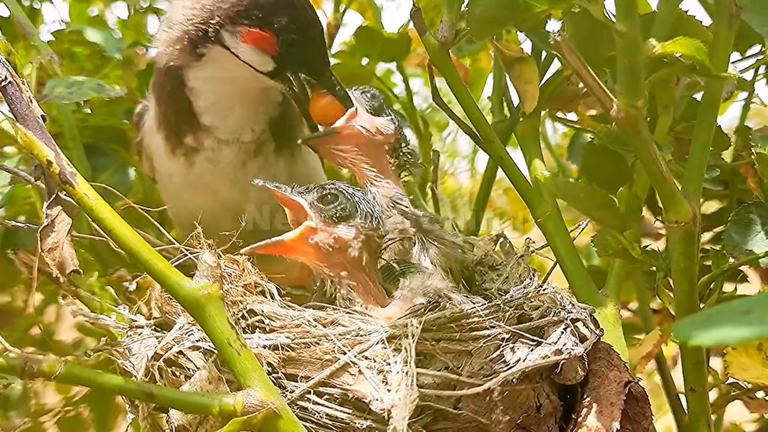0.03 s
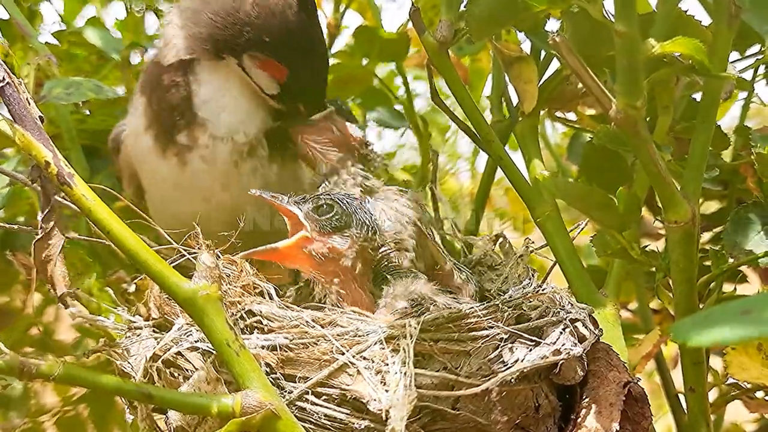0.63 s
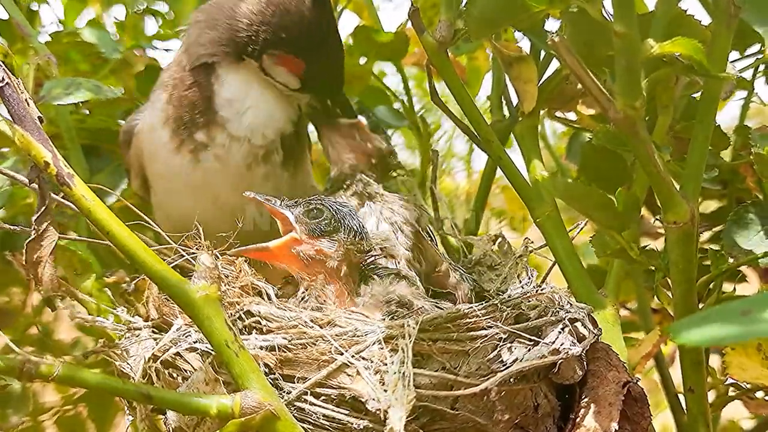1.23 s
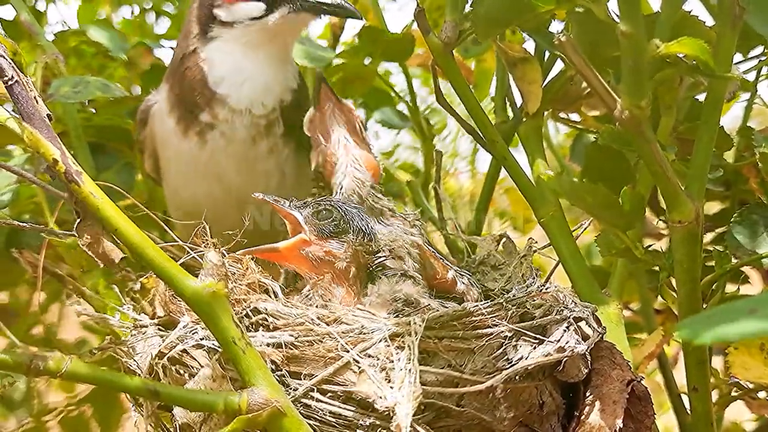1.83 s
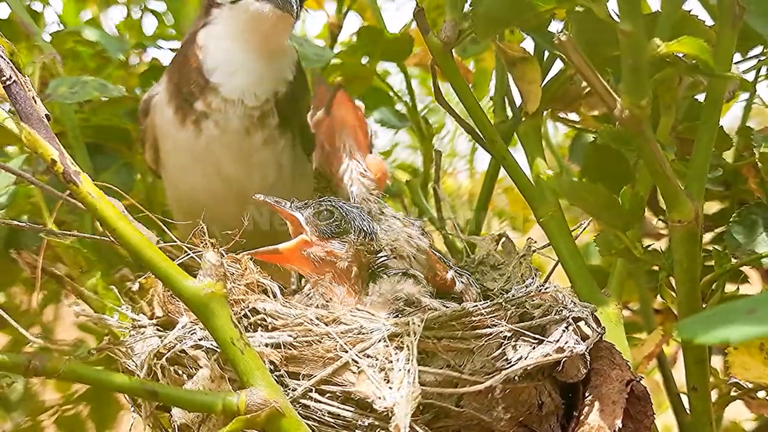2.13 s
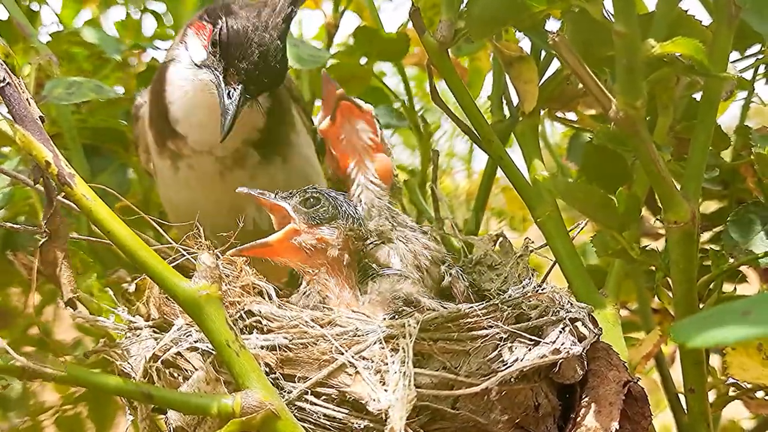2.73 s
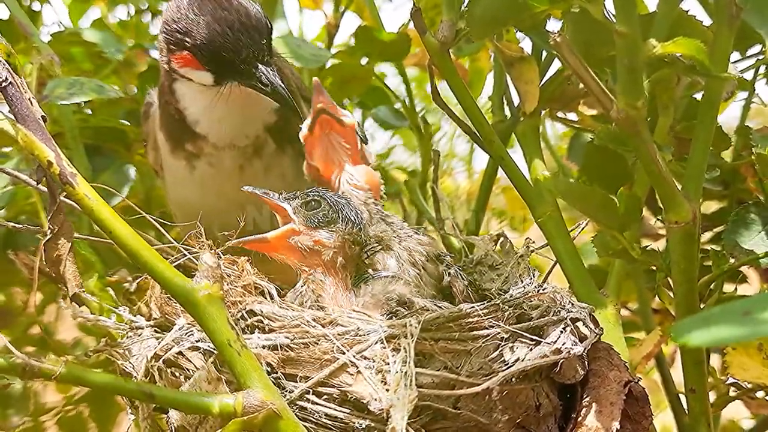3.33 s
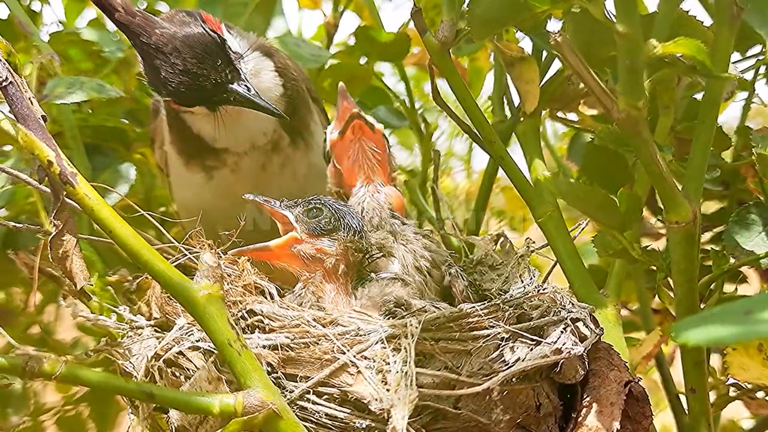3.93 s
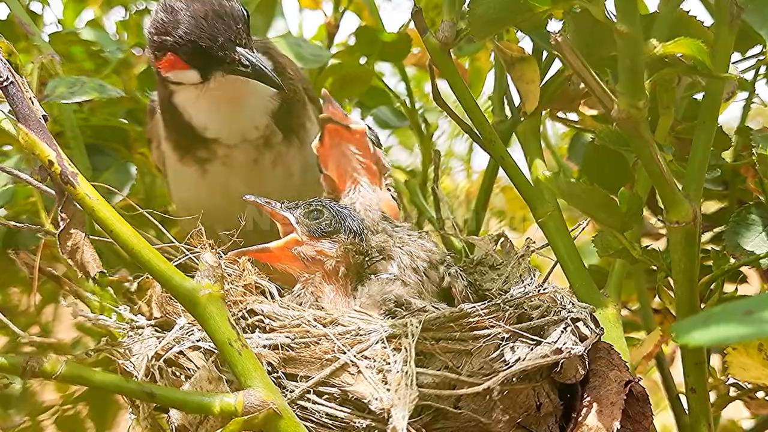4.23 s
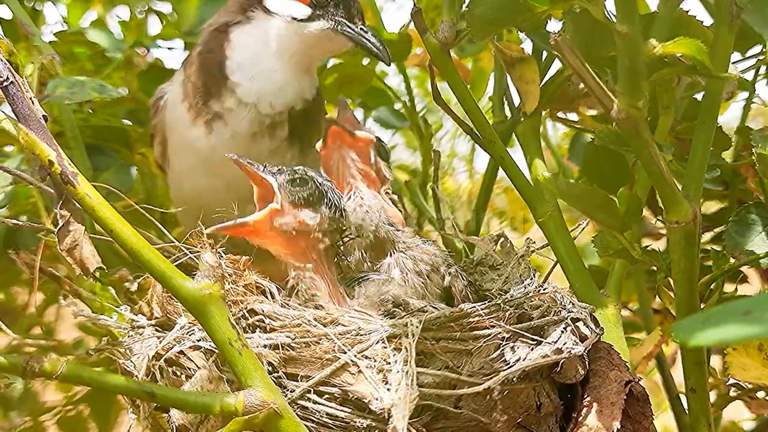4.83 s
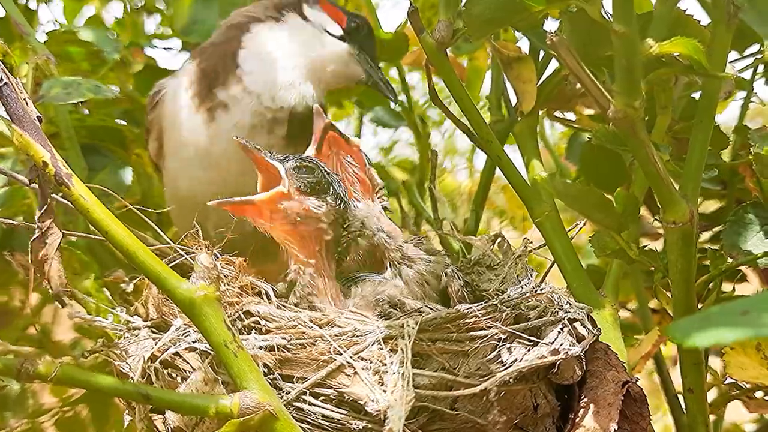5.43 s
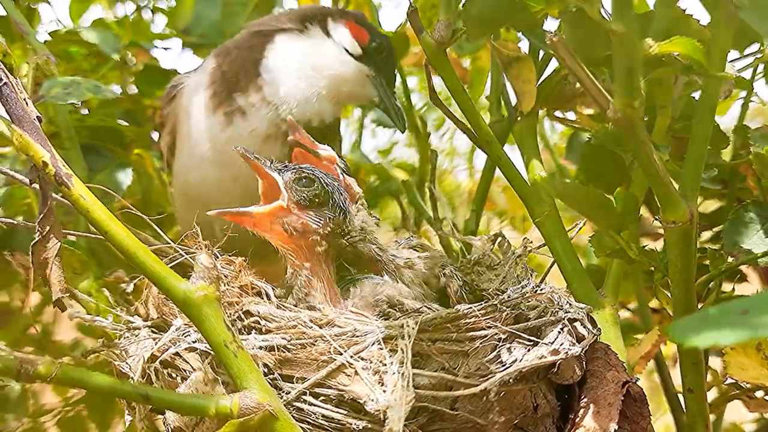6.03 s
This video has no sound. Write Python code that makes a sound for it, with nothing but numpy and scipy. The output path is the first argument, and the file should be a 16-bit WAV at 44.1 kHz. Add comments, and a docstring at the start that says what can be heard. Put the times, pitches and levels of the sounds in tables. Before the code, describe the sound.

Nestlings beg with raspy chirps and hissy squeaks while gusts buffet the microphone over a faint distant engine.

```python
"""Nestlings in a windy bush

Close to a nest in the leaves, one chick repeats a raspy arched chirp, a second bird answers with hissy
down-and-up swoops, and dry nest fibres tick. Songbirds whistle further off and a slow engine thuds in
the distance, under an outdoor hush. Gusts stir the leaves and buffet the two microphone ports,
mostly the right one."""
import sys
import numpy as np
from scipy import signal
from scipy.fft import rfft, irfft, next_fast_len
from scipy.io import wavfile
from scipy.ndimage import uniform_filter1d, map_coordinates

SR = 44100
rng = np.random.default_rng(int(sys.argv[2]) if len(sys.argv) > 2 else 0)


def bounce(signal):
    """Save signal as a 16-bit WAV file at the path given by the first command-line argument."""
    frames = np.transpose(np.atleast_2d(signal))
    limited = np.clip(frames, -1, 1)
    pcm = np.round(limited * 32767).astype(np.int16)
    wavfile.write(sys.argv[1], SR, pcm)


N = 267951

# Colour of dry nest fibres and leaves. Each row: frequency in Hz, relative level in dB.
FIBRE_SPECTRUM = [(2000, -18), (6000, -4.5), (9500, 4), (13000, -3.5), (16000, -9)]


def amp(db):
    return 10 ** (np.asarray(db) / 20)


def unit(x):
    return x / np.sqrt(np.mean(np.abs(x) ** 2) + 1e-20)


def step(x):
    """A smooth rise from 0 to 1 around x = 0."""
    return .5 + .5 * np.tanh(x / 2)


def along(points, hz):
    """Read (Hz, value) points on a log frequency axis."""
    f, values = np.transpose(points)
    return np.interp(np.log(hz + 1), np.log(f + 1), values)


def wobble(rate, size):
    """A smooth random curve, rate knots a second."""
    knots = rng.standard_normal(int(size * rate / SR) + 4)
    return map_coordinates(knots, [np.arange(size) * rate / SR])


def filtered(x, response):
    """Pass x through a complex response of frequency."""
    n = x.shape[-1]
    padded = next_fast_len(n + 4096)
    return irfft(rfft(x, padded) * response(np.fft.rfftfreq(padded, 1 / SR)), padded)[..., :n]


def noise(spectrum):
    """Noise of rms 1 with the given colour."""
    return unit(filtered(rng.standard_normal(N), lambda hz: amp(along(spectrum, hz))))


def add(track, start, x):
    """Mix x into the track from start, in seconds."""
    part = track[..., max(round(start * SR), 0):][..., :x.shape[-1]]
    part += x[..., :part.shape[-1]]


def tone(hz, rough, width_hz):
    """A gliding partial of rms 1; its rough share is smeared into a band around the pitch."""
    rough = np.clip(rough, 0, 1)
    smear = unit(wobble(width_hz, len(hz)) + 1j * wobble(width_hz, len(hz)))
    carrier = np.exp(2j * np.pi * np.cumsum(hz) / SR)
    return np.sqrt(2) * np.real((np.sqrt(1 - rough) + np.sqrt(rough) * smear) * carrier)


def gust_strength(breeze_db=-47, rise_s=0.024, fall_s=0.037, stir_db=-7, lead_s=0.15, trail_s=.22):
    """Buffeting and extra eddies per port, in dB: each gust rises, holds and falls in a slower stir."""
    # Each row: arrival and hold in seconds, left and right port levels in dB, extra small eddies in dB.
    gusts = [(0.0, 0.1, -24.5, -23.5, -0.5), (0.318, 0.34, -30, -26.5, 4), (1.719, .12, -30.5, -16, -14),
             (1.884, 0.4, -21.5, -17, 0), (2.357, 0.15, -26, -31.5, 0), (3.962, 0.16, -39, -20, 3.5),
             (4.126, .17, -27.5, -14, -7.5), (4.398, 0.29, -29.5, -15, 4.5), (4.727, 0.21, -17.5, -20, 1.5),
             (5.077, 0.038, -30, -12, -7.5), (5.2, 0.13, -29, -14.5, 6.5), (5.428, 0.098, -17, -17.5, 3.5),
             (6.003, 0.13, -34.5, -23.5, -3.5)]
    t = np.arange(N) / SR
    power, eddies = np.full((2, N), amp(breeze_db) ** 2), np.zeros((2, N))
    for arrival, hold, left_db, right_db, eddy_db in gusts:
        early, late = np.maximum(arrival - t, 0), np.maximum(t - arrival - hold, 0)
        core = np.exp(-early / rise_s - late / fall_s)
        stir = amp(stir_db) * np.exp(-early / lead_s - late / trail_s)
        gust = np.outer(amp([left_db, right_db]), np.maximum(core, stir)) ** 2
        power += gust
        eddies += eddy_db * gust
    return 10 * np.log10(power), eddies / power


def wind(db, flutter_db, lumps_db=2):
    """Turbulence on one microphone port: the harder it blows, the more small fast eddies it holds."""
    # Colours of the large and the small eddies. Each row: frequency in Hz, relative level in dB.
    rumble_spectrum = [(15, -34), (34, -11), (55, -0.5), (88, 3.5), (120, -0.5), (190, -11.5), (280, -18),
                       (500, -43), (1000, -64), (2500, -110)]
    flutter_spectrum = [(60, -56), (150, 5), (260, 2), (400, -9.5), (600, -21.5), (850, -30), (1200, -61),
                        (3000, -88)]
    rumble = unit(noise(rumble_spectrum) * amp(lumps_db * wobble(28, N)))
    flutter = unit(noise(flutter_spectrum) * amp(7.05 * wobble(45, N) + 1.2 * wobble(14, N)))
    return amp(db) * (rumble + flutter * amp(flutter_db + db + 15))


def rustle(strength_db, average_db=-62.5, db_per_wind_db=0.24, smooth_s=.5, right_db=-3, flicker_db=1.8):
    """Leaves hiss softly while the gusts pass."""
    stirred_db = uniform_filter1d(strength_db.max(axis=0), int(smooth_s * SR))
    level_db = average_db + db_per_wind_db * (stirred_db - stirred_db.mean()) + flicker_db * wobble(60, N)
    return np.array([noise(FIBRE_SPECTRUM), amp(right_db) * noise(FIBRE_SPECTRUM)]) * amp(level_db)


def engine(level_db=-37, firing_hz=22.38, pipe_hz=96, width_hz=34, port_phase_rad=1.82):
    """Far off, each firing rings a low exhaust resonance, which arrives out of step at the two ports."""
    cycles = np.cumsum(firing_hz * (1 + 0.00695 * wobble(6.3, N))) / SR
    firings = np.diff(np.floor(cycles), prepend=0) * amp(2.7 * wobble(25, N))
    pipe = lambda f: (1j * f * width_hz * 1.5 / (pipe_hz ** 2 - f * f + 1j * f * width_hz * 1.09)) ** 2
    ports = np.exp(1j * port_phase_rad * np.array([[0], [1]]))
    return unit(filtered(firings, lambda f: pipe(f) * ports)) * amp(level_db)


def air(level_db=-49, patchy_db=2):
    """Outdoor hush in drifting patches, unrelated at the two ports."""
    # Colour of the hush. Each row: frequency in Hz, relative level in dB.
    hush_spectrum = [(15, -1), (50, -7.5), (170, -1.5), (400, 1.5), (750, -9), (1050, -15.5), (1650, -7),
                     (2300, -8), (3200, -14.5), (5500, -19), (9500, -27), (15800, -40)]
    hush = signal.stft(np.array([noise(hush_spectrum), noise(hush_spectrum)]), nperseg=1024)[2]
    patches = uniform_filter1d(rng.standard_normal(hush.shape[1:]), size=6, axis=0)
    patches = uniform_filter1d(patches, size=7, axis=1)
    return amp(level_db) * signal.istft(hush * amp(patchy_db * unit(patches)), nperseg=1024)[1][:, :N]


def hisses():
    """Short unvoiced squeaks that open or close a chirp."""
    # Each row: start and length in seconds, first and last pitch in Hz, level in dB.
    squeaks = [(0.15, 0.14, 6250, 6300, -46), (0.268, 0.053, 6770, 5230, -41.5),
               (0.575, 0.055, 4300, 3900, -37), (1.461, 0.05, 4900, 3800, -42),
               (4.116, 0.044, 6600, 5200, -48), (4.664, 0.025, 5920, 5750, -39.5),
               (5, 0.069, 6950, 5900, -44), (5.105, 0.038, 6020, 5500, -35),
               (5.69, 0.051, 4410, 5400, -39.5)]
    out = np.zeros(N)
    for start, length, first_hz, last_hz, db in squeaks:
        u = np.linspace(0, 1, int(length * SR))
        hiss = tone(first_hz + (last_hz - first_hz) * u, rough=0.6, width_hz=2400)
        add(out, start, amp(db) * np.sin(np.pi * u) * hiss)
    return out


def bush(x, leaves_db, tail_db, lag_s=.0001, scatter_t60=0.022, leaf_hz=5000):
    """Sound reaches the left port first; small leaves scatter its treble and the garden adds a tail."""
    # Decay of the garden's tail. Each row: frequency in Hz, seconds to fall by 60 dB.
    foliage_t60 = [(500, 0.1), (4000, 0.23), (12000, 0.43)]
    n = SR // 4
    hz, t, bands = signal.stft(rng.standard_normal((2, n)), SR, nperseg=256)
    decay = amp(-60 * t / along(foliage_t60, hz)[:, None])
    tail = signal.istft(bands * decay, SR, nperseg=256)[1][:, :n]
    leaves = rng.standard_normal((2, n)) * amp(-60 * np.arange(n) / SR / scatter_t60)
    # This angle shares the power between the scattered and the direct path.
    split = lambda f: np.arctan(amp(leaves_db) * f * f / (f * f + leaf_hz ** 2))
    pair = x * np.ones((2, 1))
    scattered = filtered(pair, lambda f: np.sin(split(f)))
    direct = filtered(pair, lambda f: np.cos(split(f)) * np.exp(1j * np.pi * lag_s * np.outer([1, -1], f)))
    out = signal.fftconvolve(scattered, unit(leaves) / np.sqrt(n), axes=1)
    out += signal.fftconvolve(pair, amp(tail_db) * unit(tail) / np.sqrt(n), axes=1)
    add(out, 0, direct)
    return out


def chirp_arch(phase, leap_at=0.0387, leap_width=0.0505, drop_at=.73, drop_width=0.0938, full_at=-0.46):
    """Pitch lift (0 held, 1 top), level dB and rasp dB of a chirp; phase is -1 start, 0 leap, 1 end."""
    creep = .12 * np.minimum(phase, 0)
    lift = creep + step((phase - leap_at) / leap_width) - 1.42 * step((phase - drop_at) / drop_width)
    level_db = -17 * np.maximum(full_at - phase, 0) - 12 * np.maximum(phase, 0) ** 4
    # The voice breaks up at both ends and in the leap.
    edges = step((np.abs(phase) - 0.83) / leap_width)
    leap = np.exp(-((phase - leap_at) / (2 * leap_width)) ** 2)
    return lift, level_db, -2.5 + 22.5 * edges + 15.5 * leap


def begging(halfway_db=-10, rasp_db=6, jitter=0.0107, flicker_db=2.5):
    """The syrinx holds a note, leaps and falls; period doubling puts weak lines between its harmonics."""
    # Each row: time of the leap, hold and fall in seconds, held and top pitch in Hz,
    # source level, shrillness and gape in dB, roughness from 0 to 1.
    chirps = [(0.227, 0.032, 0.053, 2793, 3865, -33, 6.5, -0.5, 0.42),
              (0.634, 0.036, 0.052, 2867, 4510, -30.5, -9.5, -5.5, 0.42),
              (0.97, 0.047, 0.034, 2797, 3510, -43.5, 3, 1, 0.9),
              (1.452, 0.016, 0.032, 2546, 4425, -33.5, 5, 1.5, 0.56),
              (1.898, 0.038, 0.043, 2828, 4085, -21, -3, -7.5, 0.11),
              (2.415, 0.046, 0.048, 2785, 3700, -29, -6, 9, 0.23),
              (2.815, 0.039, 0.034, 2927, 3616, -29, -5.5, 10.5, 0.22),
              (3.211, 0.036, 0.043, 2992, 3580, -30.5, -1.5, 8, 0.08),
              (3.633, 0.035, .046, 2994, 3606, -29.5, -4, 5, 0.05),
              (4.075, 0.027, 0.053, 3036, 3755, -29, 0.5, 1, 0.21),
              (4.62, 0.035, .05, 2948, 3607, -29.5, 1, -3, 0.08),
              (5.07, 0.023, 0.043, 3032, 3606, -26.5, 4, -6.5, 0.09),
              (5.669, 0.031, 0.04, 3066, 3670, -28.5, 0.5, -8, 0.25)]
    # Resonances of the chick's throat. Each row: frequency in Hz, gain in dB.
    throat_gain = [(900, -50), (1400, -17.5), (1850, -12), (2300, -17.5), (2750, -0.5), (4450, -2.5),
                   (5000, -9), (5900, -8), (7200, -16.5), (8000, -22.5), (9000, -19), (9700, -27),
                   (10600, -24.5), (12000, -28), (15500, -35)]
    # Balance of the chick at the microphone. Each row: frequency in Hz, left minus right in dB.
    gape_balance = [(2000, -0.5), (6000, -4), (7500, 1.5), (9000, 10.5), (15000, 11)]
    out = np.zeros((2, N))
    for leap_s, hold, fall, held_hz, top_hz, db, shrill_db, gape_db, rough in chirps:
        t = np.arange(-2 * hold, 2 * fall, 1 / SR)
        lift, level_db, harsh_db = chirp_arch(np.where(t < 0, t / hold, t / fall))
        pitch = (held_hz + (top_hz - held_hz) * lift) * (1 + jitter * wobble(254.5, len(t)))
        harsh = np.clip(rough * amp(harsh_db), 0, 1)
        source = amp(rasp_db) * harsh * rng.standard_normal(len(t))
        for k in range(1, 12):
            # Higher lines are rougher and less steady, and the halfway ones gain on the harmonics.
            line_db = halfway_db * (k % 2) * min(1, (3 / k) ** 2)
            line_db += flicker_db * min(1, k / 5) * wobble(91.4, len(t))
            source += amp(line_db) * tone(k * pitch / 2, harsh * k / 3, width_hz=800) * (k * pitch < SR)
        # Effort lifts the band near 6 kHz; a wide gape opens the resonances around 9 kHz.
        effort = lambda hz: shrill_db * np.exp(-((hz - 5800) / 1000) ** 2)
        gape = lambda hz: gape_db * np.exp(-((hz - 9200) / 2700) ** 4)
        throat = lambda hz: amp(along(throat_gain, hz) + effort(hz) + gape(hz))
        voice = filtered(source * amp(db + level_db), throat)
        add(out, leap_s - 2 * hold, bush(voice, leaves_db=6.5, tail_db=-15, leaf_hz=4760))
    return filtered(out, lambda hz: amp(np.outer([.5, -.5], along(gape_balance, hz))))


def songbirds():
    """Nearly pure slurred whistles from birds further off."""
    # Each row: start and length in seconds, first, middle and last pitch in Hz, relative level in dB.
    whistles = [(2.547, 0.077, 4300, 3340, 2510, -42.5), (2.672, 0.091, 4560, 4190, 3240, -44),
                (3.02, 0.27, 2297, 2650, 2640, -44.5), (4.106, .13, 3880, 3160, 2310, -42.5),
                (4.252, 0.17, 4510, 3914, 4340, -50.5), (0.469, 0.032, 3160, 3900, 3400, -49.5),
                (1.148, 0.037, 3580, 4010, 3800, -50), (1.297, 0.028, 3070, 3490, 2920, -48),
                (3.853, 0.031, 2840, 3520, 3250, -48)]
    out = np.zeros(N)
    for start, length, *pitches, db in whistles:
        u = np.linspace(0, 1, int(length * SR))
        hz = np.polyval(np.polyfit([0, .5, 1], pitches, 2), u)
        swell = np.sqrt(np.abs(np.sin(np.pi * u)))
        add(out, start, amp(db) * swell * tone(hz, rough=0.13, width_hz=170))
    return out


def nest_ticks(life_s=.004, right_db=-8):
    """Dry nest fibres tick under the birds, nearer the left port."""
    # Each row: time in seconds, relative peak level in dB.
    ticks = [(1.585, -51), (2.1, -43), (2.125, -45), (2.257, -42), (2.497, -40), (4.553, -45), (4.87, -45),
             (5.2, -47), (5.345, -48), (5.58, -51), (5.76, -46.5)]
    t = np.arange(N) / SR
    envelope = sum(amp(db - 2.5) * np.exp(-np.abs(t - at) / life_s) for at, db in ticks)
    return np.array([noise(FIBRE_SPECTRUM), amp(right_db) * noise(FIBRE_SPECTRUM)]) * envelope


def thumps(cutoff_hz=950):
    """A passing eddy swings the pressure to and fro at the port, making a low knock."""
    # Each row: time in seconds, pitch in Hz, approximate peak level in dB.
    eddies = [(1.708, 87, -2), (2.643, 158, -11), (2.662, 119, -11.5), (4.304, 173, -2.5), (4.418, 188, -2),
              (4.431, 365, -10.5), (4.518, 280, -5.5), (4.562, 265, -0.5), (4.715, 235, -5),
              (4.764, 203, -4), (5.298, 245, -4.5)]
    out, t = np.zeros(N), np.arange(-SR // 20, SR // 20) / SR
    for at, hz, db in eddies:
        u = np.pi * hz * t
        swing = np.sin(2 * u) / (1 + u * u)
        add(out, at + t[0], amp(db + 3) * swing * np.hanning(len(t)))
    return filtered(out, lambda hz: 1 / (1 + (hz / cutoff_hz) ** 8))


def swoop_shape(t):
    """Level dB and roughness along one swoop: three hissy notes and a clear one run into each other."""
    # Each row: time from the top and half length in seconds, relative level in dB, roughness from 0 to 1.
    notes = [(-.015, .009, -10, 0.53), (0.017, 0.017, -0.5, 0.62), (0.042, .014, -4.5, .7),
             (.069, 0.015, 5.5, 0)]
    at, half_length, db, rough = np.transpose(notes)
    power = amp(db) ** 2 * np.exp(-2 * ((t[:, None] - at) / half_length) ** 2) + 1e-12
    total = power.sum(axis=1)
    return 10 * np.log10(total), power @ rough / total


def swoops(overtone_db=-38, skirt_db=-15):
    """The second bird, close by: a hissy double downsweep that clears into a short rising note."""
    # Each row: time of the second sweep's top in seconds, pitch ratio, level and closing-note gain in dB.
    calls = [(1.736, 1.01, -30, -1.5), (1.913, 1.017, -28.5, -2.5), (2.094, 1, -21, -10),
             (2.285, 0.98, -24.5, -14.5), (2.49, 1.014, -25.5, -17), (5.399, 1.01, -31, -3.5),
             (5.577, 1, -31.5, -4), (5.766, 1, -33, -10), (5.945, 1.01, -37, -1.5)]
    # Pitch of one swoop. Each row: time from that top in seconds, pitch in Hz.
    contour = [(-.028, 7170), (-.009, 5400), (.0, 6890), (.022, 4375), (.037, 3450), (.069, 4340),
               (.079, 4423), (.1, 4080)]
    out, t = np.zeros((2, N)), np.arange(contour[0][0], contour[-1][0], 1 / SR)
    hz = np.interp(t, *np.transpose(contour))
    level_db, rough = swoop_shape(t)
    for top_s, ratio, db, close_db in calls:
        pitch = ratio * hz * (1 + 0.0133 * wobble(87.3, len(t)))
        core = tone(pitch, rough, width_hz=1400)
        skirt = amp(skirt_db) * rough * tone(pitch, rough=1.0, width_hz=5800)
        overtone = amp(overtone_db) * tone(2 * pitch, rough, width_hz=1300)
        voice = (core + skirt + overtone) * amp(db + level_db + close_db * np.clip(t / 0.051, 0, 1))
        add(out, top_s + t[0], bush(voice, leaves_db=14, tail_db=-16, scatter_t60=0.037))
    return out


def scene():
    """The nest close by, songbirds and an engine far off, wind on the ports and in the leaves."""
    near = begging() + swoops() + bush(hisses(), leaves_db=25, tail_db=-16)[:, :N] + nest_ticks()
    far = bush(songbirds(), leaves_db=7, tail_db=-2)[:, :N] * amp(-2.5)
    strength_db, eddy_db = gust_strength()
    left = wind(strength_db[0], flutter_db=eddy_db[0] - 25)
    right = wind(strength_db[1], flutter_db=eddy_db[1] - 9.5) + thumps()
    return near + far + np.array([left, right]) + rustle(strength_db) + engine() + air()


def record(dry):
    """Peaks are rounded off below full scale; nothing passes above the band limit."""
    ceiling, top_hz = .95, 15830
    soft = dry / (1 + np.abs(dry / ceiling) ** 8) ** (1 / 8)
    return filtered(soft, lambda hz: hz < top_hz)


dry = scene()
out = record(dry)
bounce(out)
```